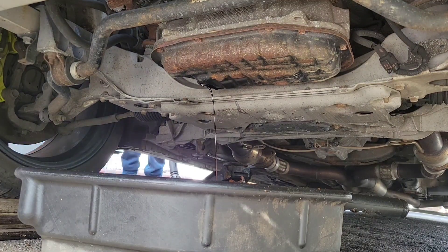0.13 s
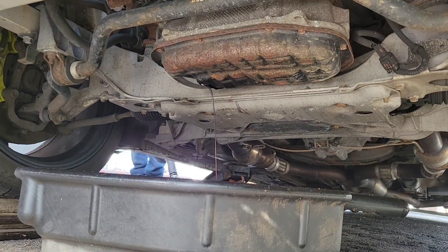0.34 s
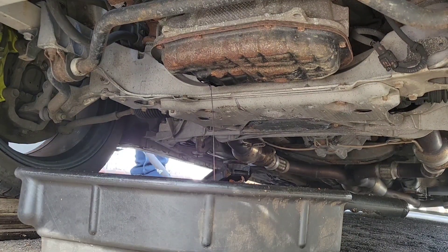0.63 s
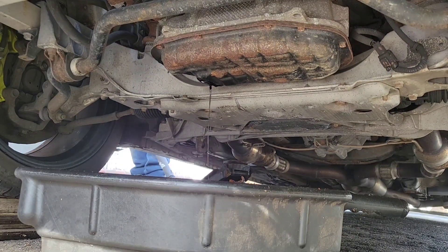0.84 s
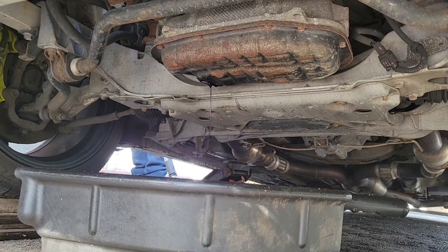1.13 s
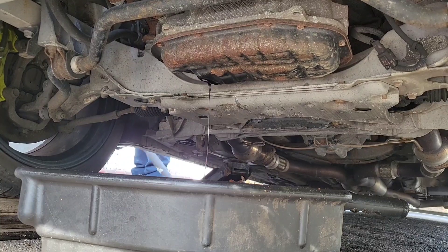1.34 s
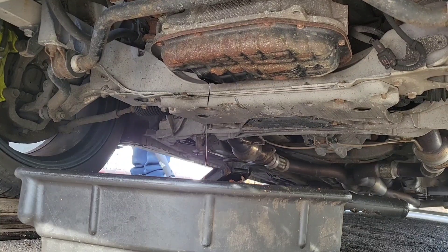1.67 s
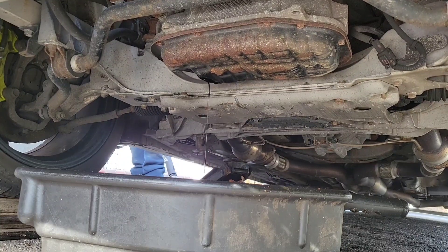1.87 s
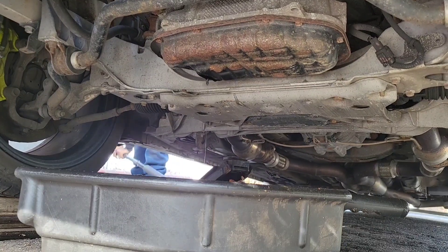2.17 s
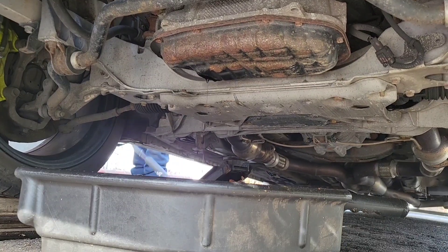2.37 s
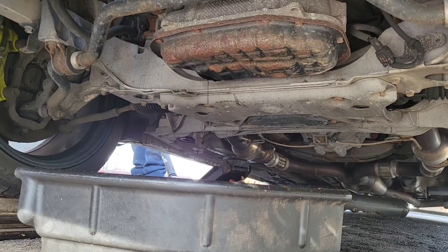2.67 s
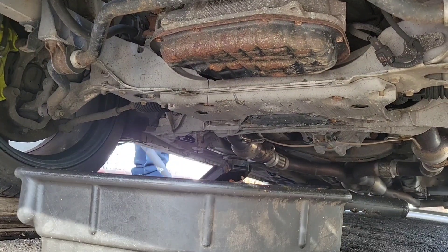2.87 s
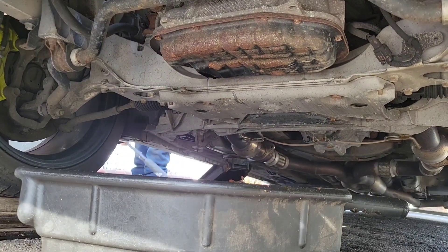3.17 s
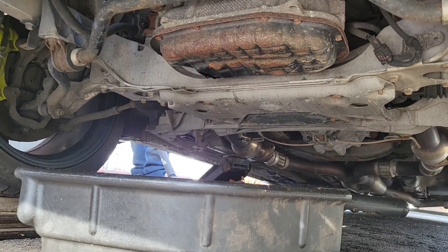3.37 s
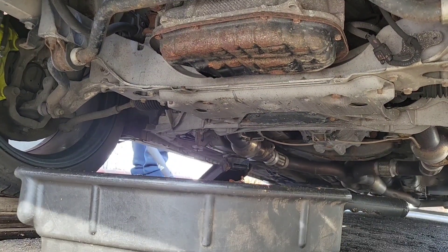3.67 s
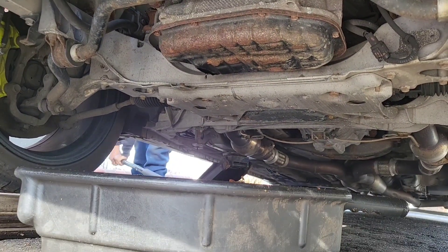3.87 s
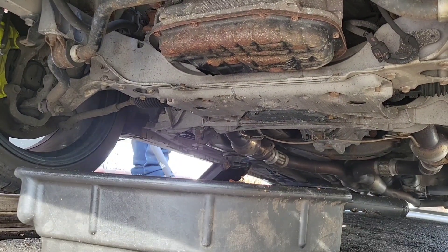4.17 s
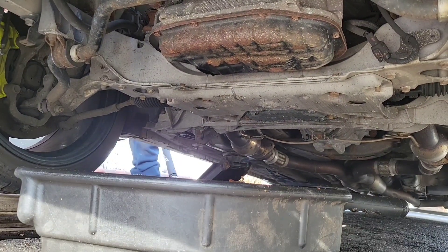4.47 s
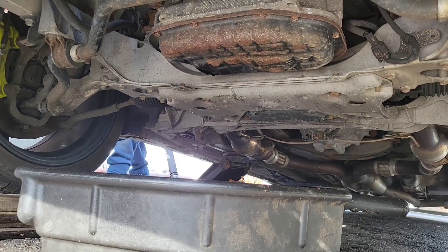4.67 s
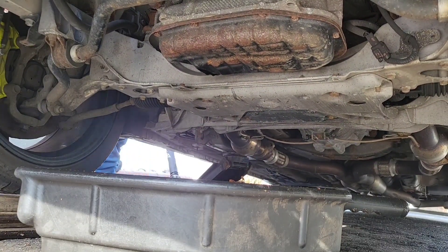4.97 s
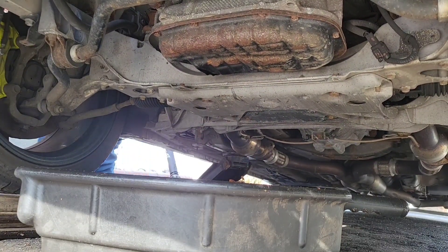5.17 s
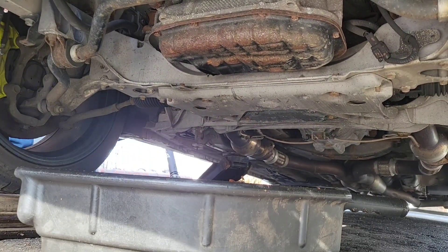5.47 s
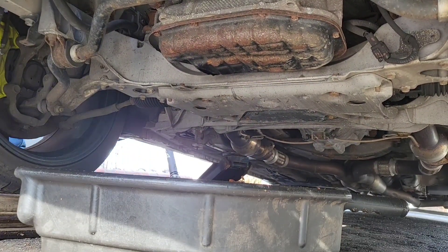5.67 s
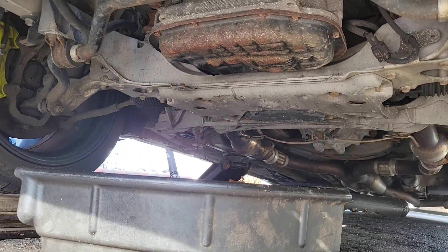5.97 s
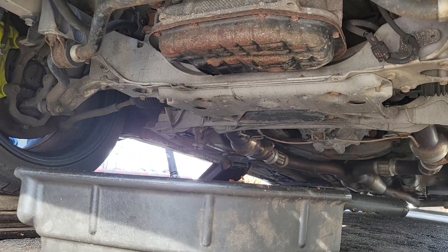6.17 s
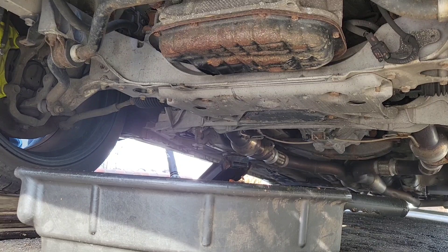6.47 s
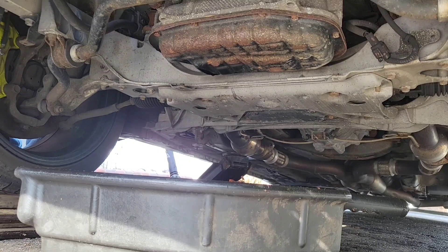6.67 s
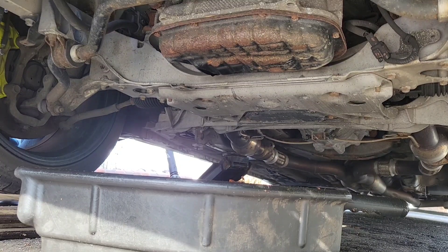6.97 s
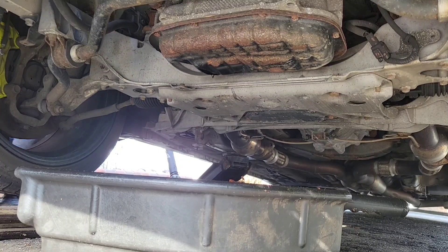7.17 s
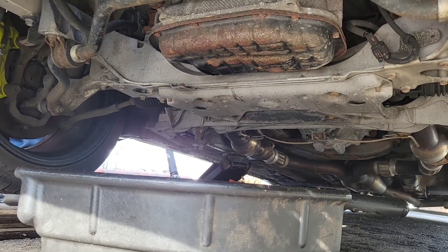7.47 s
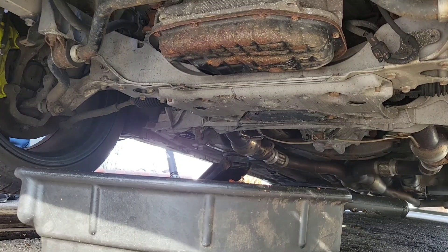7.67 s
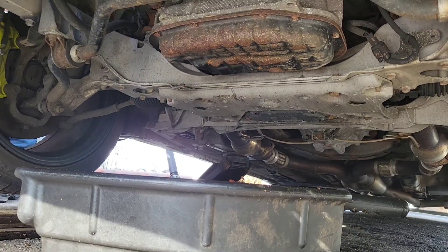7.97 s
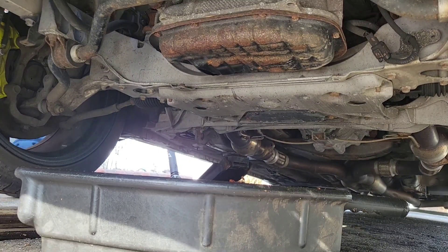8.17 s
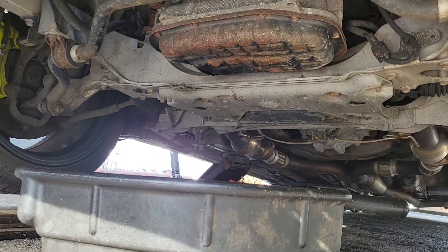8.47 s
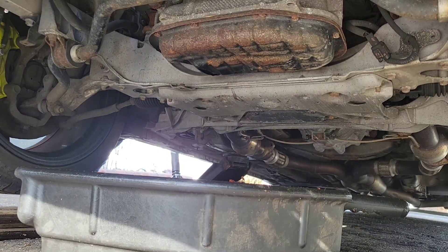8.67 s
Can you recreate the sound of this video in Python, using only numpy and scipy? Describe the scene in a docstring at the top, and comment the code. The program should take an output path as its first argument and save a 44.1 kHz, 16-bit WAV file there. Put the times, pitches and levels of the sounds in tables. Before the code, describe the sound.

Heard close up in the low gap under a car, with short fluttery echoes and quiet traffic outside. From 0 to 0.8 s a thin thread of oil gurgles and crackles into a plastic pan, with ringing bubbly plips; it then breaks up, dwindling to sparse drips and tiny ticks by 2.8 s. A floor jack is pumped at about 1.3, 2.1, 2.9 and 3.8 s, each a brief scrape, dull thud and rattling valve chatter; hollow taps fall at 1.8 and 2.3 s. A far engine hums softly, strongest near 2.4 s. At 3.85 s the chassis gives one heavy ringing clunk. Then it is calm until gritty shoe scuffs and low thuds at 5.5 to 6 s, as a heavier vehicle's rumble briefly swells around 6.3 s. A steel stand knocks dully at 7.3 s, then louder and brighter at 7.5 s. Faint scraping ends in a scuff and thud at 8.6 s.

```python
"""The last thread of oil trickles into a plastic drain pan under a car: ringing bubbles, thinning to single drips.
A floor jack is pumped four times as grit scrapes, a valve chatters and the handle comes back with a clack;
the chassis clunks as a set of ringing modes. Shoes scuff as bursts of grit clicks, and a stand is set down
with two modal knocks. These close sounds echo in the low gap between floor and underbody;
filtered-noise traffic and an engine hum outside.
"""
import sys
import numpy as np
from scipy import signal
from scipy.fft import rfft, irfft
from scipy.io import wavfile
from scipy.ndimage import uniform_filter1d

SR = 44100
rng = np.random.default_rng(int(sys.argv[2]) if len(sys.argv) > 2 else 0)


def persist_wave(psi):
    """Save psi, clipped to +-1, as 16-bit WAV."""
    counts = np.round(np.clip(psi, -1, 1) * 32767).astype(np.int16)
    wavfile.write(sys.argv[1], SR, np.atleast_2d(counts).T)


N = 388521
TIME = np.arange(N) / SR
AGE = TIME[:SR // 2]  # time since the start of a short sound, in s

# Street noise colour, each band levelled later: (frequency [Hz], relative density [dB per Hz])
STREET_SPECTRUM = [(12, -42), (20, -24.5), (72, -8.5), (92, -14.5), (140, -25.5), (300, -21.5),
                   (450, -24.5), (881, -21), (1820, -33), (4950, -54.5), (15500, -67)]
# Steady traffic outside, and one heavier vehicle going by
RUMBLE_DB, WASH_DB = -45, -48.5
PASS_S, PASS_WIDTH_S, PASS_DB = 6.3, 0.22, -42
# A far engine, loudest early on
ENGINE_HZ, ENGINE_S, ENGINE_WIDTH_S, ENGINE_DB = 83.6, 2.36, 1.3, -47.5

# Soles and stand scuffing on gritty concrete: (time [s], length [s], level [dB], tilt [dB per octave])
SCUFFS = [(2.249, 0.032, -52, 2), (4.862, 0.15, -62.5, 2), (5.525, 0.072, -48.5, 5.5),
          (5.655, 0.087, -48.5, 9.5), (5.859, 0.042, -51.5, 9), (5.891, 0.034, -41, 2.5),
          (6.008, 0.04, -60, 4.5), (6.473, 0.027, -51, 5), (7.31, 0.24, -61, 5.5), (8.22, 0.2, -61, 6.5),
          (8.59, 0.077, -45.5, 9), (8.615, 0.034, -37.5, -6)]
# Single grains cracking under a sole, the jack or the stand: (time [s], level [dB])
GRAIN_CRACKS = [(2.271, -47), (2.7, -56.5), (3.069, -53.5), (3.122, -60), (6.473, -47.5), (6.9, -62),
                (7.691, -61.5), (5.547, -58), (5.681, -56), (3.158, -60)]
CRACK_TILT_DB = 5  # per octave
# Crunching grit: (frequency [Hz], level [dB])
GRIT_SPECTRUM = [(300, -1), (1000, 1.5), (1800, 11), (3000, 18.5), (4200, 12.5), (6000, 8), (12000, -7),
                 (15000, -11)]
# Dull low thuds: feet, and the jack handle coming back: (time [s], level [dB])
THUDS = [(2.462, -41), (5.472, -39.5), (5.867, -37), (8.622, -38.5)]
# Colour of a thud: (frequency [Hz], level [dB])
THUD_SPECTRUM = [(30, -11), (90, 14.5), (200, 6), (900, 1), (3000, -21), (15000, -60)]

# Stand meeting the floor: (time [s], level before trim and low-pass [dB], low-pass cut-off [Hz],
# offset on the mode levels [dB], foot ["near" or "far"])
STAND_KNOCKS = [(7.303, -20.5, 1600, 13, "near"), (7.313, -24.5, 1400, 3, "near"),
                (7.4693, -33.5, 5000, -5, "far"), (7.4824, -11, 5500, 7.5, "far"),
                (7.4926, -19, 5000, -9, "far"), (7.556, -29.5, 4000, -2, "far")]
# Dense response of the stand: (frequency [Hz], level [dB])
STAND_SPECTRUM = [(60, -11), (400, -2), (720, 3.5), (1100, -0.5), (1450, -4), (2100, -12), (2900, -22.5),
                  (3500, -22.5), (4500, -39), (15000, -51)]
# Ringing modes of the stand: (frequency [Hz], near-foot level [dB], far-foot level [dB], t60 [s])
STAND_RINGS = [(520, -8, -16, 0.21), (592, -12.5, -4, 0.28), (728, -21, 9, 0.04), (952, 6, -0.5, 0.065),
               (1074, -2.5, 0, 0.16), (1156, -23, -0.5, 0.16), (1477, -1.5, -6.5, 0.13),
               (1822, -21, -8, 0.14), (2110, -30, -7, 0.062), (2654, -6, -15, 0.063),
               (3460, -24, -8.5, 0.026)]

# Chassis settling on the jack: (time [s], level [dB], offset on the mode levels [dB])
CHASSIS_CLUNKS = [(3.8422, -13, -23), (3.846, -8.5, -2.5), (3.8574, -13.5, -23)]
# Dense response of the chassis: (frequency [Hz], level [dB])
CHASSIS_SPECTRUM = [(60, -37), (150, -12), (285, 4), (400, -4), (750, 4.5), (1000, -0.5), (1250, -7.5),
                    (2000, -14.5), (2550, -15), (3300, -29), (15000, -54)]
# Ringing modes of the chassis: (frequency [Hz], level [dB], t60 [s])
CHASSIS_RINGS = [(218, -14.5, 0.23), (276, -15, 0.19), (562, -10, 0.26), (716, 3.5, 0.13),
                 (787, -0.5, 0.13), (897, -3.5, 0.22), (980, -9, 0.22), (1122, -3, 0.14), (1750, -7, 0.14),
                 (2540, -9.5, 0.16)]

# Jack strokes: (time [s], stroke level [dB], level of the handle rubbing as it is lifted [dB])
JACK_STROKES = [(1.327, -35.5, -82), (2.113, -31, -54.5), (2.945, -30, -51), (3.768, -29.5, -85)]
# Dense response of the valve: (frequency [Hz], level [dB])
VALVE_SPECTRUM = [(150, -5), (330, 10), (1100, 8), (1550, 14), (2000, 5), (3000, 1), (3800, -6.5),
                  (4500, -20.5), (15000, -41)]
# Ringing modes of the jack body: (frequency [Hz], level [dB], t60 [s])
JACK_RINGS = [(706, -6, 0.058), (1540, -1, 0.046), (1740, -7, 0.061), (2126, -7, 0.068)]
# Scrape and thud just before the valve chatters (dB re stroke level); then the handle comes back up
PUSH_LEAD_S, PUSH_S, PUSH_DB, PUSH_TILT_DB = 0.041, 0.038, -20, 1.5
LOAD_LEAD_S, LOAD_DB = 0.028, -6.5
LIFT_DELAY_S, LIFT_S, LIFT_TILT_DB = 0.112, 0.13, 0

# The thread runs steadily, thins abruptly as it breaks up, then dwindles; its crackle stops when dry
BREAK_S, BREAK_LENGTH_S, BREAK_LOSS_DB, DWINDLE_DB_PER_S, DRY_S = 0.76, 0.2, 6.5, 1, 2.7
# Runs of bubbles dragged under: (time [s], length [s], level [dB], first pitch [Hz], last pitch [Hz])
GURGLE_RUNS = [(0, 0.25, -51.5, 1050, 1115), (.35, 0.204, -50.5, 1146, 897), (0.601, .15, -54, 1096, 1146),
               (0.765, 0.22, -50.5, 936, 1150)]
# Colour of the crackle: (bubble pitch [Hz], level [dB])
CRACKLE_SPECTRUM = [(1600, 4.5), (2700, 1.5), (4000, 8), (10000, 13), (15000, -2)]
# Drops that trap a ringing bubble: (time [s], bubble level before its echoes [dB], starting pitch [Hz])
TRAPPED_BUBBLES = [(.209, -43, 2650), (0.237, -42, 2680), (0.244, -39.5, 3610), (0.254, -31, 1050),
                   (.309, -35, 1136), (0.31, -47, 1730), (0.346, -36, 2490), (0.475, -38, 9500),
                   (0.589, -34.5, 980), (0.594, -36, 2570), (.619, -33, 5170), (0.675, -43, 2520),
                   (.694, -43, 3820), (.765, -36, 2590), (0.769, -40, 1700), (0.844, -45, 1750),
                   (0.989, -30, 1104), (1.148, -31, 1763), (1.208, -39.5, 6900), (1.634, -39.5, 6420),
                   (1.734, -38.5, 2630), (1.924, -33.5, 8730), (1.67, -45.5, 2550), (2.648, -41.5, 3260)]
# Drops and bursting bubbles that tick on the surface: (time [s], level [dB], brightest pitch [Hz])
SURFACE_TICKS = [(.135, -48.5, 6900), (.16, -45.5, 7100), (.282, -56, 12700), (0.4768, -43.5, 9930),
                 (0.593, -46.5, 12300), (.752, -49, 7600), (0.8627, -53, 6440), (1.174, -54, 9300),
                 (1.191, -53.5, 4200), (1.291, -58.5, 6500), (1.605, -58.5, 4000), (1.7203, -57, 6640),
                 (1.7896, -54.5, 8050), (1.935, -50, 2620), (2.037, -54.5, 10700), (2.65, -52.5, 6940),
                 (2.789, -56, 9200)]
# Hollow taps: a drop on the plastic pan, and the jack handle clacking: (time [s], level [dB])
HOLLOW_TAPS = [(1.763, -42), (2.273, -42.5)]
# Colour of a hollow tap: (frequency [Hz], level [dB])
TAP_SPECTRUM = [(280, -3), (700, -5), (1100, 4), (1600, -13), (15000, -32)]
# The oil lands close and almost straight ahead: direct gain beside its echoes, lag of the right microphone
PAN_DIRECT, PAN_LAG_S = .7, .00005

# Stereo width of the microphone pair: (frequency [Hz], side level re mid [dB])
STEREO_WIDTH = [(25, -11.5), (130, -11.5), (290, -6.5), (600, 4.5), (1200, 3.5), (2500, 2), (15000, -1.5)]
CUTOFF_HZ = 15700


def amp(db):
    """Decibels to gain."""
    return 10 ** (np.asarray(db) / 20)


def rms_one(x):
    """Scale to rms 1."""
    return x / np.sqrt(np.mean(x ** 2) + 1e-20)


def as_blow(x):
    """Scale a short sound to the energy of 20 ms at rms 1."""
    energy = np.mean(np.sum(x ** 2, axis=-1))
    return x / np.sqrt(energy / (SR * .02) + 1e-20)


def at_hz(points, hz):
    """Read a spectrum on a log-frequency axis."""
    f, value = np.transpose(points)
    return np.interp(np.log(hz + 1), np.log(f), value)


def tilted(spectrum, tilt_db):
    """Lean a spectrum by so many dB per octave."""
    return [(hz, db + tilt_db * np.log2(hz)) for hz, db in spectrum]


def add(out, s, sound):
    """Mix a sound in at time s, cut at the end of the track."""
    room = out[:, round(s * SR):][:, :sound.shape[-1]]
    room += sound[..., :room.shape[-1]]


def drift(rate):
    """Smooth random wander of spread 1, drawn at every 40th sample and interpolated."""
    r = np.exp(-80 * np.pi * rate / SR)
    noise = rng.standard_normal(N // 40 + 2002)
    slow = signal.lfilter([1], [1, -2 * r, r * r], noise)[2000:]  # skip the filter's start-up
    return np.interp(np.arange(N) / 40, np.arange(len(slow)), rms_one(slow))


def swell(nearest_s, width_s):
    """Gain of a source that comes near and recedes, as one over its distance."""
    return 1 / np.hypot(1, (TIME - nearest_s) / width_s)


def panned(left_db):
    """Gains of the two microphones for a source to one side."""
    return amp(np.array([[left_db], [-left_db]]) / 2)


def colour(x, spectrum):
    """Causal (minimum-phase) filter with the given spectrum, built by folding its cepstrum."""
    size = 8192
    cepstrum = irfft(np.log(amp(at_hz(spectrum, np.fft.rfftfreq(size, 1 / SR)))))
    cepstrum[1:size // 2] *= 2
    response = irfft(np.exp(rfft(cepstrum[:size // 2], size)))[:size // 2]
    return signal.fftconvolve(x, response[None], axes=-1)[:, :x.shape[-1]]


def echoes(t60, late_db, late_t60=0.3, size=17):
    """Dense stereo reflections, a fast decay over a faint long one, evened so that no pitch is favoured."""
    decay = amp(-60 * AGE / t60) + amp(late_db - 60 * AGE / late_t60)
    spectrum = rfft(rng.standard_normal((2, len(AGE))) * decay)
    mid, side = irfft(spectrum / np.sqrt(uniform_filter1d(abs(spectrum) ** 2, size)))
    fade = np.minimum(1, amp(60 - 240 * AGE))  # closes the second half of the tail
    return np.array([mid + side, mid - side]) / np.sqrt(2) * fade


def under_car(x, direct, t60, late_db, lag_s=.0003):
    """Direct sound, a little later on the right, and its flutter between floor, pan and underbody."""
    response = echoes(t60, late_db)
    response[[0, 1], [0, round(lag_s * SR)]] += direct
    return signal.fftconvolve(np.atleast_2d(x), response, axes=-1)[:, :x.shape[-1]]


def struck(spectrum, modes, t60, late_db, ring_db, left_leads_turns=0.29, build_s=0.0022):
    """One blow: a crowd of short-lived modes, and a few strong ones out of step at the two microphones."""
    onset = 1 - np.exp(-AGE / build_s)
    crowd = as_blow(colour(onset * echoes(t60, late_db), spectrum))
    rings = 0
    for hz, db, decay in modes:
        turns = rng.random() + np.array([[left_leads_turns], [0]])
        rings = rings + amp(db - 60 * AGE / decay) * np.sin(2 * np.pi * (hz * AGE + turns))
    return as_blow(crowd + amp(ring_db) * onset * rings)


def bubble(hz, cycles, rise):
    """A damped sine, 60 dB down after so many cycles, that climbs as the bubble nears the surface."""
    life = AGE[:SR // 10] * hz / cycles
    pitch = hz * (1 + rise * np.minimum(life, 1))
    return amp(-60 * life) * np.sin(2 * np.pi * np.cumsum(pitch) / SR)


def grains(per_s, spread_db):
    """Random clicks of uneven size and either sign."""
    sizes = amp(spread_db * np.minimum(rng.exponential(1, N), 4)) * rng.choice([-1, 1], N)
    return rms_one(sizes * (rng.random(N) < per_s / SR))


def snap(spectrum, direct, t60):
    """One sharp click and its flutter."""
    click = colour(signal.unit_impulse(len(AGE))[None], spectrum)
    return as_blow(under_car(click, direct, t60, late_db=-24, lag_s=PAN_LAG_S))


def scrape(length, tilt_db, per_s=600, spread_db=5.0):
    """Grit crunches under a pressure that swells and lets go."""
    chance = rng.random(len(AGE))
    size = rng.exponential(1, len(AGE))
    sign = rng.choice([-1, 1], len(AGE))
    grit = (chance < per_s / SR) * sign * amp(spread_db * np.minimum(size, 4))
    pressure = np.sin(np.pi * np.minimum(AGE / length, 1))
    crunch = rms_one(colour((grit * pressure)[None], tilted(GRIT_SPECTRUM, tilt_db)))
    return under_car(crunch * np.sqrt(np.mean(pressure ** 2)), direct=0.36, t60=0.07, late_db=-17.5)


def thud():
    """A dull low thud, as dark dense reflections."""
    return as_blow(colour(echoes(t60=0.21, late_db=-43), THUD_SPECTRUM))


def street(second_db=-15, split_hz=130):
    """Traffic rumble and a smooth wash through the open door; a far engine swells and recedes."""
    noise = colour(rng.standard_normal((2, N + SR)), STREET_SPECTRUM)[:, SR:]
    low = signal.sosfilt(signal.butter(4, split_hz, fs=SR, output="sos"), noise)
    high = signal.sosfilt(signal.butter(4, split_hz, "high", fs=SR, output="sos"), noise)
    rumble = np.hypot(amp(RUMBLE_DB), amp(PASS_DB) * swell(PASS_S, PASS_WIDTH_S))
    # the engine is a wandering fundamental and its second harmonic, wavering in level
    phase = 2 * np.pi * np.cumsum(ENGINE_HZ * (1 + 0.02457 * drift(3.9))) / SR
    hum = rms_one(np.sin(phase) + amp(second_db) * np.sin(2 * phase))
    waver = amp(2 * drift(8))
    engine = amp(ENGINE_DB) * swell(ENGINE_S, ENGINE_WIDTH_S) * waver * hum
    return rumble * rms_one(low) + amp(WASH_DB) * rms_one(high) + engine


def scuffs_and_thuds():
    """Grit slides and single grains crack on the floor; feet and the handle land with thuds."""
    out = np.zeros((2, N))
    for s, length, db, tilt_db in SCUFFS:
        add(out, s, amp(db) * scrape(length, tilt_db))
    for s, db in GRAIN_CRACKS:
        add(out, s, amp(db) * snap(tilted(GRIT_SPECTRUM, CRACK_TILT_DB), direct=0.32, t60=0.043))
    for s, db in THUDS:
        add(out, s, amp(db) * thud())
    return out


def stand(trim_db=1, tick_db=-38):
    """Steel feet meet the floor one after the other, ringing their own modes, each touch with a gritty tick."""
    out = np.zeros((2, N))
    for s, db, contact_hz, ring_db, foot in STAND_KNOCKS:
        modes = []
        for hz, near_db, far_db, t60 in STAND_RINGS:
            modes.append((hz, near_db if foot == "near" else far_db, t60))
        blow = struck(STAND_SPECTRUM, modes, t60=0.079, late_db=-26, ring_db=ring_db)
        soften = signal.butter(2, contact_hz, fs=SR, output="sos")
        add(out, s, amp(db + trim_db) * signal.sosfilt(soften, blow))
        gritty = as_blow(colour(echoes(t60=0.036, late_db=-18), GRIT_SPECTRUM))
        add(out, s, amp(db / 2 + tick_db) * gritty)  # the tick varies half as much in dB as the knock
    return out


def chassis():
    """The load shifts on the jack: a touch, one heavy ringing clunk and a dead rebound."""
    out = np.zeros((2, N))
    for s, db, ring_db in CHASSIS_CLUNKS:
        clunk = struck(CHASSIS_SPECTRUM, CHASSIS_RINGS, t60=0.064, late_db=-24.0,
                       ring_db=ring_db, left_leads_turns=-0.27)
        add(out, s, amp(db) * clunk)
    return out


def jack(touch_db=-5.0, gap_s=0.0046, accent_db=3.0, count=4):
    """Each stroke scrapes and takes the load; the valve rattles unevenly, hardest at first; the handle rubs up."""
    out = np.zeros((2, N))
    for s, db, lift_db in JACK_STROKES:
        add(out, s - PUSH_LEAD_S, amp(db + PUSH_DB) * scrape(PUSH_S, PUSH_TILT_DB))
        add(out, s - LOAD_LEAD_S, amp(db + LOAD_DB) * thud())
        for k, late in enumerate(rng.random(count)):
            force_db = accent_db * (1 - np.sin(np.pi * k / count))
            touch = struck(VALVE_SPECTRUM, JACK_RINGS, t60=0.041, late_db=-25.5, ring_db=4.0)
            wait = (k + late * min(k, 1) / 2) * gap_s  # the first touch is never late
            add(out, s + wait, amp(db + touch_db + force_db) * touch)
        add(out, s + LIFT_DELAY_S, amp(lift_db) * scrape(LIFT_S, LIFT_TILT_DB))
    return out


def hollow_taps():
    """A drop taps the plastic pan and the jack handle clacks, each a coloured click and its flutter."""
    out = np.zeros((2, N))
    for s, db in HOLLOW_TAPS:
        add(out, s, amp(db) * snap(TAP_SPECTRUM, direct=0.55, t60=0.065))
    return out


def plip(hz, rebound_s=0.014, rebound_db=-11, rebound_ratio=1.314):
    """A trapped bubble rings and climbs (small ones for more cycles); the drop's rebound traps a smaller one."""
    ring = bubble(hz, cycles=1.8 * np.sqrt(hz), rise=0.29)[None]
    smaller = bubble(hz * rebound_ratio, cycles=np.sqrt(hz), rise=.22)
    add(ring, rebound_s * (.5 + rng.random()), amp(rebound_db) * smaller)
    return under_car(ring, PAN_DIRECT, t60=0.052, late_db=-30, lag_s=PAN_LAG_S)


def tick(hz, below_db=-19, above_db=-10, burst_s=0.0016, ring_db=-2):
    """A film of oil snaps: a tiny noise burst, brightest at the pitch where its cavity briefly rings."""
    burst = rng.standard_normal((1, SR // 10)) * np.exp(-AGE[:SR // 10] / burst_s)
    hump = [(hz / 8, below_db), (hz, 0), (hz * 2, above_db)]
    ring = as_blow(bubble(hz, cycles=np.sqrt(hz), rise=.1))
    film = as_blow(colour(burst, hump)) + amp(ring_db) * ring
    return as_blow(under_car(film, PAN_DIRECT, t60=.06, late_db=-37, lag_s=PAN_LAG_S))


def drips():
    """Drops fall into the pan as ringing bubbles and surface ticks."""
    out = np.zeros((2, N))
    for s, db, hz in TRAPPED_BUBBLES:
        add(out, s, amp(db) * plip(hz))
    for s, db, hz in SURFACE_TICKS:
        add(out, s, amp(db) * tick(hz))
    return out


def flow(s):
    """Strength of the thread of oil, 1 while it runs steadily."""
    broken = np.clip((s - BREAK_S) / BREAK_LENGTH_S, 0, 1)
    return amp(-BREAK_LOSS_DB * broken - DWINDLE_DB_PER_S * np.maximum(s - BREAK_S, 0))


def gurgle(per_s=62, detune_share=0.044, spread_db=5.0, shed_hz=1740, shed_db=-9, count=24):
    """The thread drags bubble chains under, gliding in pitch; each sheds another of very uneven strength."""
    out = np.zeros((2, N))
    for s, length, db, first_hz, last_hz in GURGLE_RUNS:
        run = np.zeros((1, len(AGE)))
        for k, (detune, strength, shed) in enumerate(rng.standard_normal((count, 3))):
            along = (k + rng.random()) / (per_s * length)  # 0 to 1 through the run
            stray = np.exp(detune_share * detune)
            if along < 1:
                hz = (first_hz + (last_hz - first_hz) * along) * stray
                main = bubble(hz, cycles=105, rise=0.067)
                offspring = bubble(shed_hz * stray, cycles=27, rise=0.069)
                add(run, along * length, amp(spread_db * strength) * main)
                add(run, along * length, amp(shed_db + 2 * spread_db * shed) * offspring)
        level = amp(db) * np.sqrt(length / AGE[-1])  # holds the level whatever the run's length
        add(out, s, level * under_car(rms_one(run), direct=0.85, t60=0.033, late_db=-32, lag_s=PAN_LAG_S))
    return out


def burble(floor_db=-48.5, spread_db=9.0, low_hz=1250, high_hz=5600, per_s=120, count=240):
    """Middling bubbles chirp upward round the thread for two seconds, fewer and softer as the flow fails."""
    pops = np.zeros((1, N))
    for k, (late, size, strength, chance) in enumerate(rng.random((count, 4))):
        s = (k + late) / per_s
        hz = low_hz * (high_hz / low_hz) ** size
        if chance < flow(s):
            gain = np.sqrt(flow(s)) * amp(floor_db + spread_db * strength)
            add(pops, s, gain * bubble(hz, cycles=0.61 * np.sqrt(hz), rise=0.25))
    return under_car(pops, PAN_DIRECT, t60=0.11, late_db=-35, lag_s=PAN_LAG_S)


def trickle(crackle_db=-63.5, per_s=170, size=24):
    """Tiny bubbles of many pitches burst where the thread lands, fewer and weaker as the flow fails."""
    crackle = np.zeros((1, N))
    pops = grains(per_s * flow(TIME) * (TIME < DRY_S), spread_db=-3.0)
    pitches = rng.choice(np.geomspace(1600, 14500, size), N)
    for i in np.flatnonzero(pops):
        hz = pitches[i]
        gain = pops[i] * amp(at_hz(CRACKLE_SPECTRUM, hz)) * np.sqrt(hz * flow(i / SR))
        add(crackle, i / SR, gain * bubble(hz, cycles=9.6, rise=0.13))
    level = amp(crackle_db) / crackle[:, :SR].std()  # set by the first second
    return under_car(level * crackle, direct=0.17, t60=0.15, late_db=-16, lag_s=PAN_LAG_S)


def scene():
    """All sources at the two microphones."""
    metal = jack() + panned(left_db=-1.5) * chassis() + panned(left_db=1.0) * stand()
    oil = drips() + gurgle() + burble() + trickle()
    return street() + scuffs_and_thuds() + metal + hollow_taps() + oil


def record(dry):
    """A close microphone pair: bass narrowed, middle widened, peaks rounded, top cut."""
    # mid and side share the power, so that widening leaves the total alone
    share = [(hz, 10 * np.log10(2 / (1 + amp(db) ** 2)), db) for hz, db in STEREO_WIDTH]
    mid = colour((dry[:1] + dry[1:]) / 2, [(hz, mid_db) for hz, mid_db, db in share])
    side = colour((dry[:1] - dry[1:]) / 2, [(hz, mid_db + db) for hz, mid_db, db in share])
    pair = np.vstack([mid + side, mid - side])
    rounded = pair / (1 + pair ** 4) ** (1 / 4)
    top_cut = signal.ellip(10, .2, 80, CUTOFF_HZ, fs=SR, output="sos")
    return signal.sosfilt(top_cut, rounded)


dry = scene()
out = record(dry)
persist_wave(out)
```